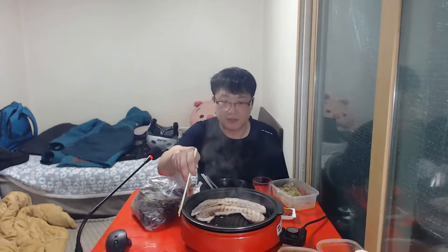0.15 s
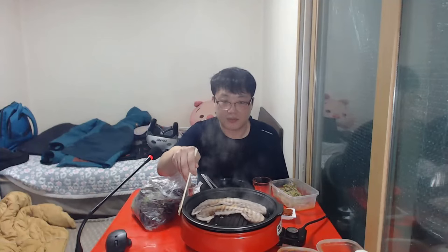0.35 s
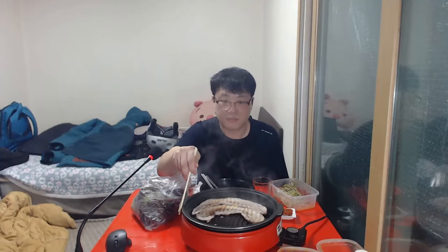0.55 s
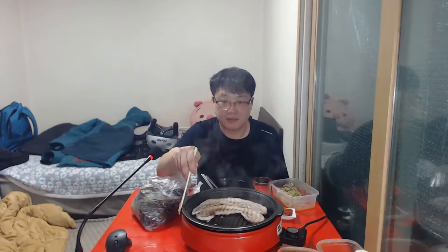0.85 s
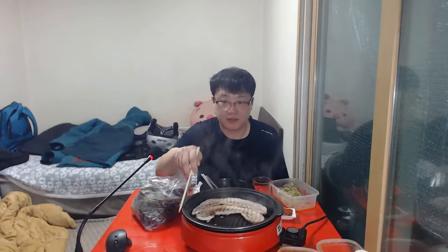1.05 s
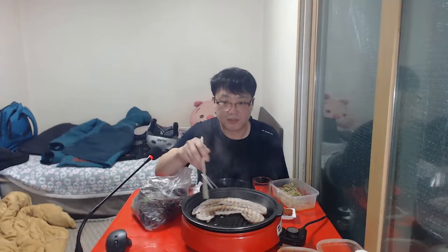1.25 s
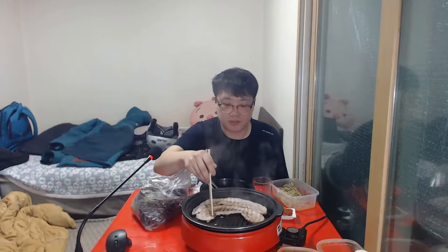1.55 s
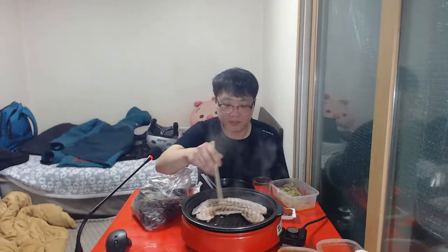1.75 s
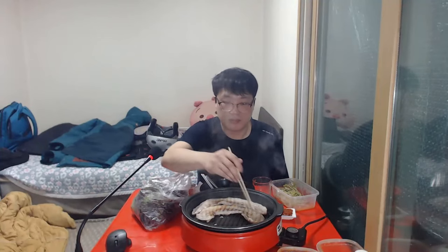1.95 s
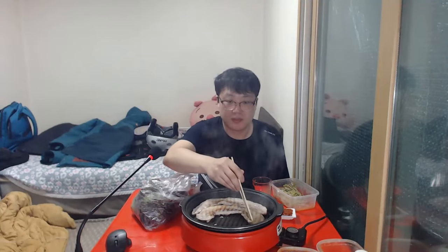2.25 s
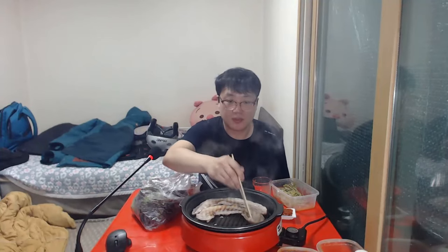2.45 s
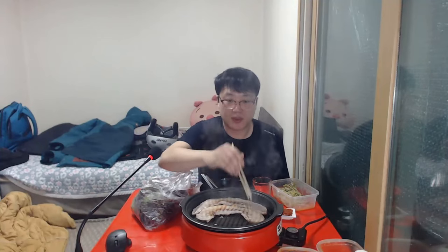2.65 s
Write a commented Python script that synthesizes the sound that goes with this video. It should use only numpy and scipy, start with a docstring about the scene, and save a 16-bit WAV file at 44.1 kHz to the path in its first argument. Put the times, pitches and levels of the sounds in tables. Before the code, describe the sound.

A thin, bright frying hiss starts quietly under a flurry of dull table knocks, brightens with crackles, swells strongest after two seconds, then eases after a low bump; small quiet room, one plain microphone.

```python
"""Meat on a grill pan

A small room, one mono microphone, every source straight to it with no distance modelled. Slices of meat
sizzle on an electric grill pan: four bands of patchy noise, three with dense bursting bubbles, swell in steps
as the meat is moved and pressed. Spits of fat, from sharp and loud to faint and low, are clusters of close
tones. Soft bumps ring the modes of the table, which trembles as a wavering deep tone in rumble. Steady room
noise lies underneath."""
import sys
import numpy as np
from scipy import signal
from scipy.fft import rfft, irfft, next_fast_len
from scipy.io import wavfile
from scipy.ndimage import uniform_filter1d, map_coordinates

SR = 44100
rng = np.random.default_rng(int(sys.argv[2]) if len(sys.argv) > 2 else 0)


def unload_audio(sound):
    """Save the sound as a 16-bit wav file, at the path given as the first command line argument."""
    columns = np.transpose(np.atleast_2d(sound))
    # keep every value between -1 and 1, then stretch to whole-number steps
    steps = np.round(np.clip(columns, -1, 1) * 32767)
    wavfile.write(sys.argv[1], SR, steps.astype(np.int16))


N = 123479  # length [samples], 2.8 s

# Strength of the frying:
# (time [s], high hiss level [dB], fizz level [dB], bubbling level [dB], low sputter level [dB])
SIZZLE_LEVELS = [(0.0, -56, -60, -63.5, -73.5), (0.08, -56, -60, -66.5, -71.5),
                 (0.23, -51, -60.5, -64.5, -71.5), (0.24, -47.5, -57, -64, -67),
                 (0.26, -51, -57.5, -67, -69), (0.42, -53, -58.5, -64.5, -73), (0.47, -52.5, -56, -65, -73),
                 (0.49, -52.5, -56.5, -64, -68.5), (0.52, -51, -57.5, -68, -72),
                 (0.689, -54.5, -61, -64, -73), (0.83, -54.5, -60, -68, -70),
                 (1.0, -53, -57.5, -66.5, -72.5), (1.03, -54.5, -59.5, -65, -71.5),
                 (1.07, -52.5, -55, -61.5, -71), (1.14, -54, -60, -59.5, -75.5),
                 (1.18, -47, -53, -57, -69.5), (1.33, -46.5, -53, -52, -69), (1.46, -48.5, -51.5, -60, -69),
                 (1.5, -49.5, -56.5, -56.5, -68), (1.54, -48.5, -50, -57, -67),
                 (1.57, -48, -51.5, -53, -64), (1.65, -49.5, -55.5, -60.5, -65),
                 (1.71, -46.5, -52.5, -55.5, -65), (1.98, -48, -53, -54.5, -68.5),
                 (2.01, -46.5, -52, -57, -72.5), (2.06, -45, -50.5, -52, -70.5),
                 (2.089, -42.5, -49, -46.5, -62.5), (2.091, -38, -46, -45.5, -59),
                 (2.14, -38, -45.5, -51.5, -60), (2.25, -37, -44.5, -50.5, -59.5),
                 (2.32, -40.5, -48, -53.5, -63), (2.34, -37.5, -43.5, -48.5, -61),
                 (2.38, -39, -42, -55, -56.5), (2.47, -41, -48.5, -50, -65), (2.5, -39.5, -49, -55.5, -62),
                 (2.54, -40.5, -45.5, -50.5, -56.5), (2.59, -42.5, -47.5, -55.5, -63.5),
                 (2.8, -44, -52, -59.5, -64)]
# Spectral shapes of the four bands, from high to low: (frequency [Hz], relative gain [dB])
HISS_SHAPE = [(7700, -33), (7960, -14), (8060, -9.5), (8500, -7), (9000, -4.5), (10500, -6), (12500, -8.5),
              (15500, -9.5), (15800, -7)]
FIZZ_SHAPE = [(3300, -40), (3900, -13), (4500, -4), (5000, -4), (5700, -2), (6400, 0), (7200, -1),
              (7500, -5), (7950, -7), (8300, -40)]
BUBBLING_SHAPE = [(1600, -40), (2200, -14), (2400, -5), (2800, -6), (3300, -2), (3750, 1), (4400, -3),
                  (5300, -40)]
SPUTTER_SHAPE = [(250, -36), (400, -36), (600, -10.5), (760, -5), (950, -1.5), (1400, -0.5), (2100, 0.5),
                 (2800, -12)]
NARROW_DB = 4.5  # rms depth of the narrow patches [dB]


def sizzle():
    """Four bands of frying: steam noise in patches, with bursting bubbles on all but the lowest."""
    hiss = patchy(2.6, 4, 5) + 0.6 * patchy(NARROW_DB, 1, 7)
    hiss += 0.51 * bubbles(count=9000, low_hz=6980, high_hz=15200, cycles=1.95, scatter_db=1.0)

    fizz = patchy(4.9, 3, 6) + 1.0 * patchy(NARROW_DB, 1, 7)
    fizz += 0.36 * bubbles(count=5000, low_hz=3930, high_hz=8130, cycles=5.8, scatter_db=4.5)

    bubbling = patchy(6.4, 3, 6) + 0.9 * patchy(NARROW_DB, 1, 7)
    bubbling += 0.26 * bubbles(count=4000, low_hz=2086, high_hz=4590, cycles=6.0, scatter_db=1.0)

    sputter = patchy(4.26, 1, 8)

    bands = [(hiss, HISS_SHAPE), (fizz, FIZZ_SHAPE), (bubbling, BUBBLING_SHAPE), (sputter, SPUTTER_SHAPE)]
    times, *levels = np.transpose(SIZZLE_LEVELS)
    mix = np.zeros(N)
    for db, (band, shape) in zip(levels, bands):
        mix += level_curve(times, db) * coloured(band, shape)
    return mix


def bubbles(count, low_hz, high_hz, cycles, scatter_db):
    """Bubbles burst as short damped sines at random times, pitches and sizes, rms 1 together."""
    when, height, size = rng.random((3, count, 1))
    k = np.arange(200)  # samples in one burst
    pitch = low_hz * (high_hz / low_hz) ** height
    turns = pitch * k / SR
    envelope = turns * np.exp(-2 * turns / cycles)  # peaks after cycles / 2
    # sizes differ; the larger scatter_db, the more a few bubbles stand out
    strength = amp(-scatter_db * np.log(0.012 + size))
    bursts = strength * envelope * np.sin(2 * np.pi * turns)
    places = (when * N).astype(int) + k
    return unit(np.bincount(places.ravel(), bursts.ravel())[:N])


# Spits of fat, from sharp and loud to faint and low: (time [s], level [dB], pitch [Hz], rise [s])
FAT_SPITS = [(0.456, -60, 6400, 0.007), (1.076, -44, 9800, .001), (1.178, -39, 8900, 0.00067),
             (1.308, -41.5, 7700, 0.00082), (1.32, -53, 3800, 0.0097), (1.575, -67, 552, 0.025),
             (1.697, -62, 952, 0.0083), (1.755, -49.5, 3800, 0.0053), (1.916, -56, 4100, 0.0066),
             (2.091, -50, 1800, .001), (2.094, -55, 1407, 0.011), (2.189, -40, 8000, 0.001),
             (2.225, -42, 8600, 0.0011), (2.24, -58, 1110, 0.0051), (2.252, -35, 9500, 0.0013),
             (2.337, -38.5, 6300, 0.0064), (2.344, -34, 6460, .001)]
SPIT_SPREAD = 0.061  # relative spread of pitch within a spit


def spits():
    """Each spit is a short cluster of six close tones that swells and dies."""
    out = np.zeros(N + SR)
    t = np.arange(4000) / SR
    for start_s, db, hz, rise_s in FAT_SPITS:
        pitch = hz * (1 + SPIT_SPREAD * rng.standard_normal((6, 1)))
        phase = 2 * np.pi * rng.random((6, 1))
        cluster = np.sin(2 * np.pi * pitch * t + phase).sum(0) / np.sqrt(6)
        swell = t / rise_s * np.exp(1 - t / rise_s)  # reaches 1 at rise_s
        out[round(start_s * SR):][:len(t)] += amp(db) * swell * cluster
    return out[:N]


# Soft bumps on the table, by strength of each group of modes:
# (time [s], deep level [dB], middle level [dB], upper level [dB])
TABLE_BUMPS = [(.002, -74, -72, -50), (0.059, -39.5, -62, -58), (0.071, -69, -57, -39.5),
               (0.104, -58, -48, -44), (0.118, -52, -61, -42), (0.179, -34, -37, -33),
               (0.22, -62, -48, -37.5), (0.237, -52, -36.5, -43.5), (.262, -40, -53, -47),
               (.280, -38, -43.5, -45), (0.296, -66, -56, -46.5), (0.323, -61, -60, -50),
               (0.358, -58, -47.5, -57), (0.37, -41, -63, -77), (0.399, -64, -57, -47.5),
               (0.421, -71, -68, -53), (0.482, -70, -84, -55), (.540, -46, -79, -55.5),
               (0.576, -65, -64.5, -60), (0.599, -72, -74, -54), (0.712, -86, -91, -69),
               (1.596, -72, -71, -81), (2.130, -34, -50.5, -62), (2.149, -49, -53, -47.5),
               (2.268, -77, -68, -79), (2.534, -55, -60, -53), (2.542, -28, -36.5, -35),
               (2.597, -67, -61, -53.5), (2.618, -58, -58, -67), (2.668, -67, -66, -46.5),
               (2.696, -68, -75, -60)]
# Modes of the table top in three groups: (frequency [Hz], relative level [dB], 60 dB decay time [s])
DEEP_MODES = [(71, -15.5, 0.25), (100, -11, 0.05), (126, -8.5, 0.1)]
MIDDLE_MODES = [(191.5, 6.2, 0.065), (225.7, 4.9, 0.057)]
UPPER_MODES = [(273, 1, 0.093), (318, -9.5, 0.056), (364, -15, 0.04), (483, -15, 0.093)]
SOFT_S = 0.0027  # rise of a bump [s]
VARY_DB, DETUNE = 2.5, 0.04  # scatter of each mode's level [dB] and relative pitch
DULL_HZ = 410  # soft bumps excite little above this [Hz]


def table():
    """Every soft bump rings the deep, middle and upper modes of the table top."""
    out = np.zeros(N + SR)
    t = np.arange(SR // 4) / SR
    rise = 1 - np.exp(-(t / SOFT_S) ** 2)
    for start_s, *levels in TABLE_BUMPS:
        body = np.zeros(len(t))
        for db, modes in zip(levels, (DEEP_MODES, MIDDLE_MODES, UPPER_MODES)):
            body += amp(db) * ring(modes, t)
        out[round(start_s * SR):][:len(t)] += rise * body
    return signal.sosfilt(signal.butter(4, DULL_HZ, fs=SR, output="sos"), out[:N])


def ring(modes, t):
    """Struck modes are decaying sines, each a little off in level and pitch."""
    total = np.zeros(len(t))
    for hz, db, t60 in modes:
        level = db + VARY_DB * rng.standard_normal()
        pitch = hz * (1 + DETUNE * rng.standard_normal())
        total += amp(level - 60 * t / t60) * np.sin(2 * np.pi * pitch * t)
    return total


# Trembling of the table while an arm leans or moves on it: (time [s], level [dB])
TREMBLE_LEVELS = [(0.0, -51), (0.01, -74), (0.06, -43), (0.08, -56), (0.121, -42.5), (0.15, -60),
                  (0.181, -36), (0.191, -49), (0.218, -39.5), (0.25, -38), (0.28, -68), (0.33, -57),
                  (0.35, -51), (0.37, -54.5), (0.39, -49), (0.42, -68), (0.46, -72), (0.489, -53),
                  (0.52, -78), (0.539, -58.5), (0.63, -68), (0.65, -69), (0.71, -90), (0.96, -96),
                  (1.06, -86), (1.15, -93), (1.53, -102), (1.569, -63), (1.6, -65), (1.61, -56),
                  (1.68, -86), (1.72, -79), (1.74, -102), (1.78, -69), (1.828, -60.5), (1.91, -86),
                  (1.96, -77), (1.99, -100), (2.05, -99), (2.06, -79), (2.09, -62), (2.125, -62),
                  (2.14, -54), (2.18, -56), (2.24, -63.5), (2.33, -58), (2.38, -73), (2.47, -57),
                  (2.52, -58.5), (2.55, -44.5), (2.65, -56), (2.75, -53), (2.8, -66)]
# Spectral shape of the rumble around the tone: (frequency [Hz], relative gain [dB])
RUMBLE_SHAPE = [(40, -69), (60, 2), (85, 3.5), (120, 0.5), (150, -16), (300, -20), (450, -20), (600, -68)]
TREMBLE_HZ, WAVER_HZ = 78.7, 4.04  # centre pitch and its random wavering [Hz]
TREMBLE_ROUGH = 0.92  # rms of the rumble relative to the tone


def tremble():
    """A deep tone of the table, driven unsteadily, with rumble around it."""
    # a smooth curve through 25 random values per second
    waver = map_coordinates(rng.standard_normal(80), [np.arange(N) / SR * 25])
    turns = np.cumsum(TREMBLE_HZ + WAVER_HZ * waver) / SR
    tone = np.sqrt(2) * np.sin(2 * np.pi * turns)
    rumble = coloured(rng.standard_normal(N), RUMBLE_SHAPE)
    return level_curve(*np.transpose(TREMBLE_LEVELS)) * unit(tone + TREMBLE_ROUGH * rumble)


# Spectral shape of the small room's noise: (frequency [Hz], relative gain [dB])
ROOM_SHAPE = [(20, -8), (50, -6), (80, -4), (150, -9.5), (300, -9.5), (600, -5.5), (900, -29)]
ROOM_DB = -83  # rms level [dB]


def room():
    """The room's low background is patchy noise at one steady overall level."""
    return amp(ROOM_DB) * coloured(patchy(3.4, 1, 8), ROOM_SHAPE)


def patchy(patchy_db, wide, long):
    """Noise, rms 1, whose gain wanders in patches, wide x long cells of 86 Hz x 6 ms."""
    cells = signal.stft(rng.standard_normal(N), nperseg=512)[2]
    field = rng.standard_normal(cells.shape)
    for _ in range(2):
        field = uniform_filter1d(field, wide, 0)
        field = uniform_filter1d(field, long, 1)
    gain = amp(patchy_db * unit(field))
    return unit(signal.istft(cells * gain, nperseg=512)[1][:N])


def coloured(x, points):
    """x shaped by (frequency [Hz], gain [dB]) points, nearly silent outside them, rms 1."""
    m = next_fast_len(N + 8192)
    f, db = np.transpose(points)
    log_hz = np.log(np.fft.rfftfreq(m, 1 / SR) + 1)  # + 1 avoids log(0)
    gain = amp(np.interp(log_hz, np.log(f), db, -120, -120))
    return unit(irfft(rfft(x, m) * gain, m)[:N])


def level_curve(times, db):
    """Gain at every sample, gliding in decibels between the given times [s]."""
    return amp(np.interp(np.arange(N) / SR, times, db))


def amp(db):
    """Decibels to gain."""
    return 10 ** (np.asarray(db) / 20)


def unit(x):
    """Scaled to rms 1."""
    return x / np.sqrt(np.mean(x ** 2) + 1e-20)


def scene():
    """All sources on one microphone, the same in both channels."""
    mono = sizzle() + spits() + table() + tremble() + room()
    return np.array([mono, mono])


LOW_CUT_HZ, TOP_HZ = 63, 15760  # bass corner and band limit of the microphone path [Hz]


def record(dry):
    """The microphone loses the deepest bass; nothing passes above the band limit."""
    m = next_fast_len(N + 8192)
    hz = np.fft.rfftfreq(m, 1 / SR)
    low_cut = 1 / np.sqrt(1 + (LOW_CUT_HZ / (hz + 1)) ** 6)
    return irfft(rfft(dry, m) * low_cut * (hz < TOP_HZ), m)[:, :N]


dry = scene()
out = record(dry)
unload_audio(out)
```